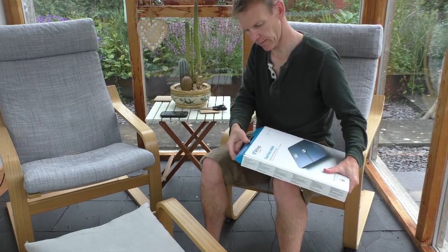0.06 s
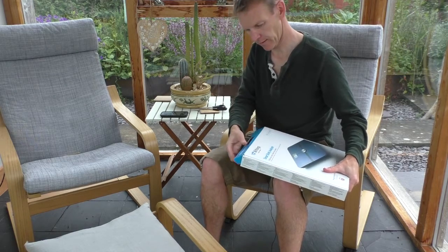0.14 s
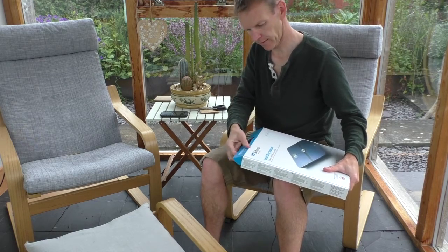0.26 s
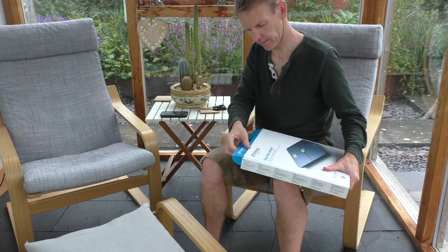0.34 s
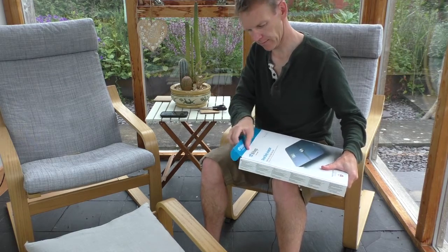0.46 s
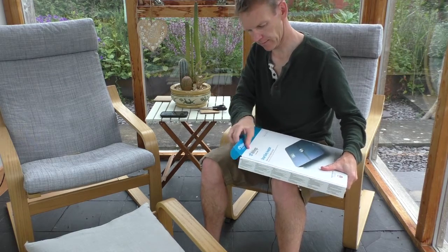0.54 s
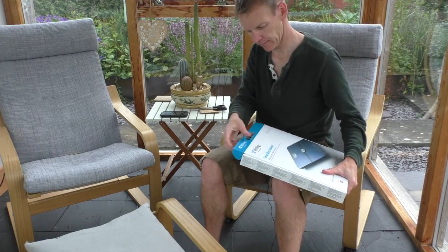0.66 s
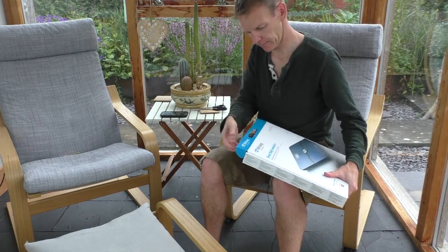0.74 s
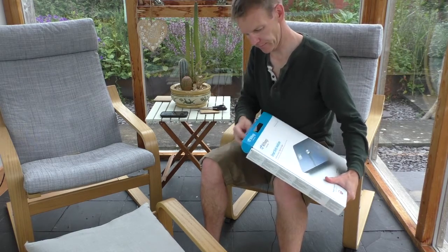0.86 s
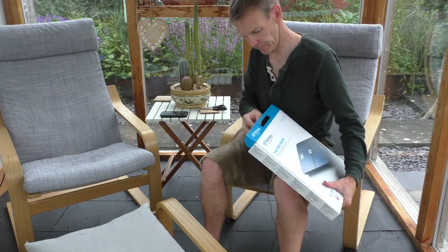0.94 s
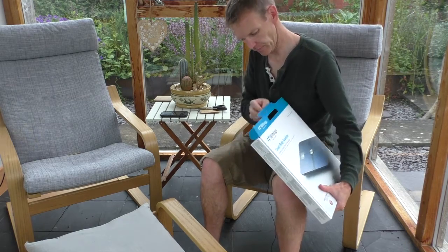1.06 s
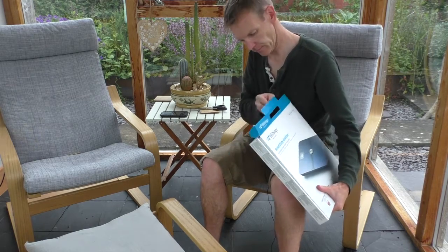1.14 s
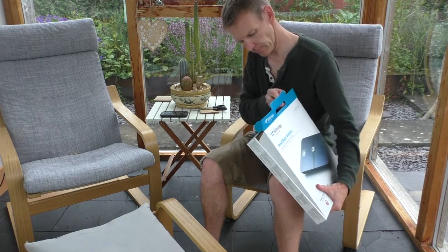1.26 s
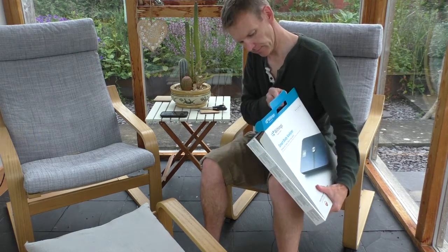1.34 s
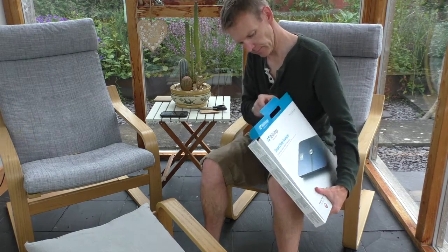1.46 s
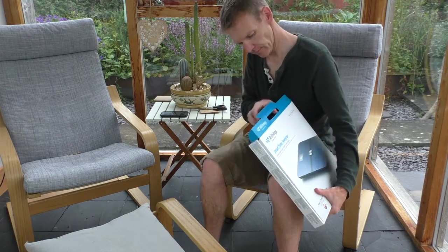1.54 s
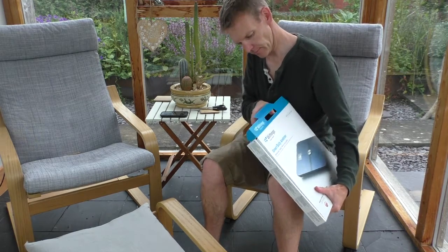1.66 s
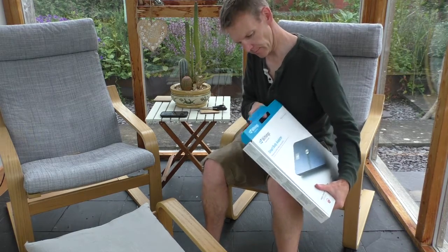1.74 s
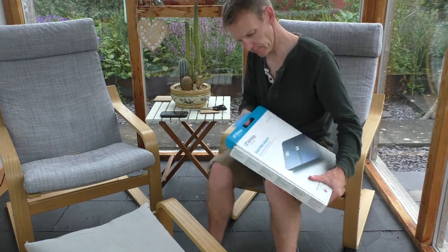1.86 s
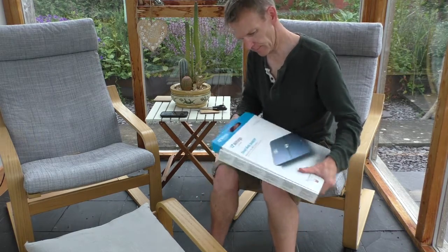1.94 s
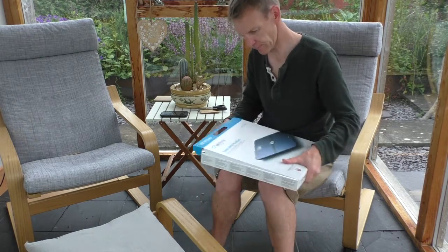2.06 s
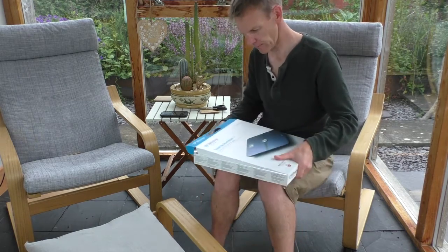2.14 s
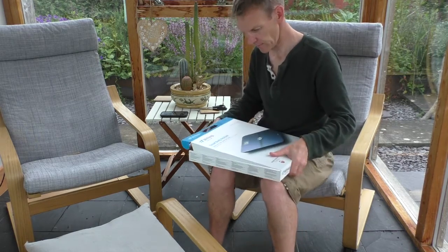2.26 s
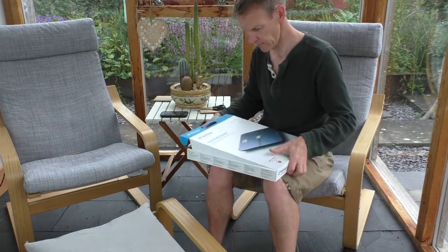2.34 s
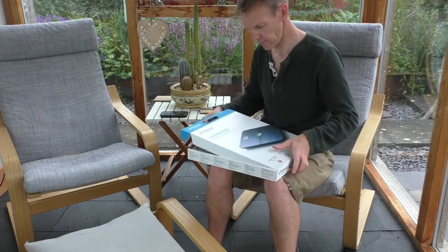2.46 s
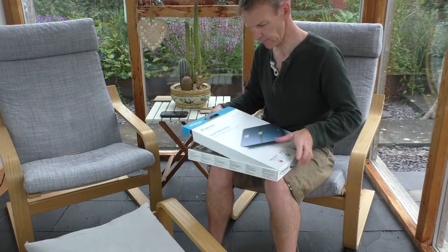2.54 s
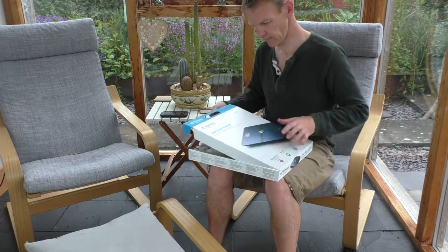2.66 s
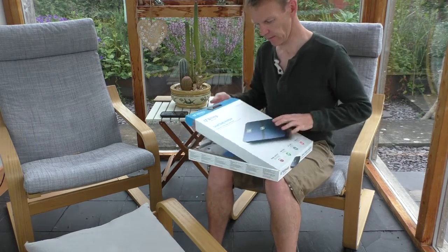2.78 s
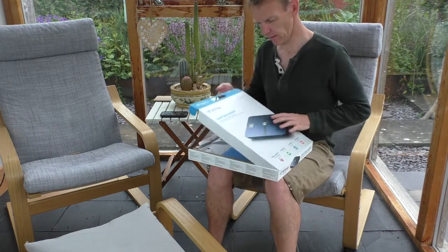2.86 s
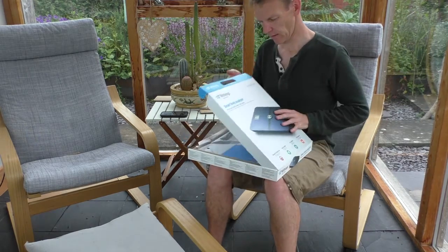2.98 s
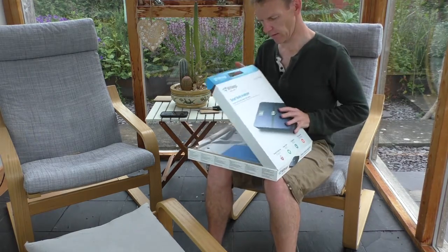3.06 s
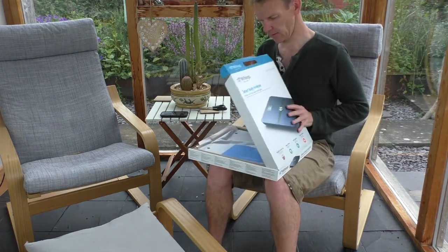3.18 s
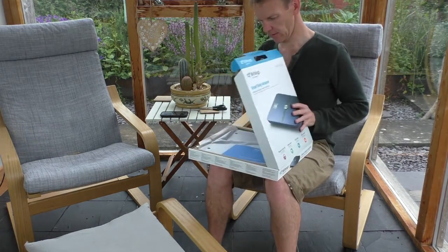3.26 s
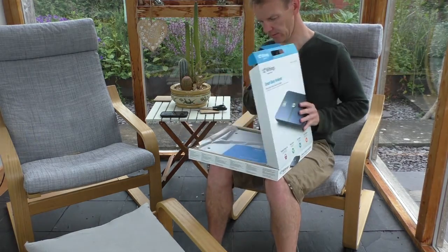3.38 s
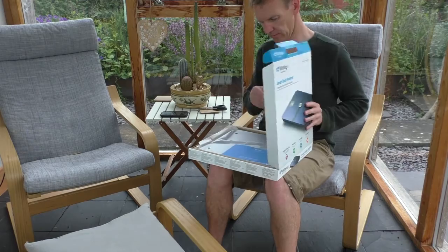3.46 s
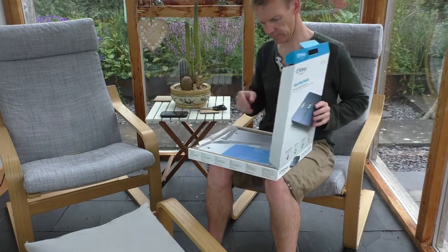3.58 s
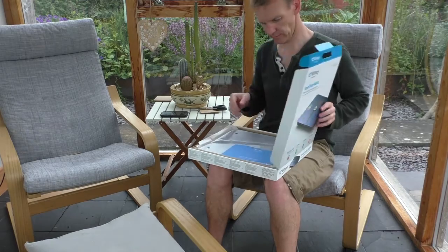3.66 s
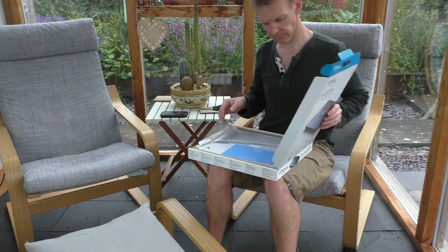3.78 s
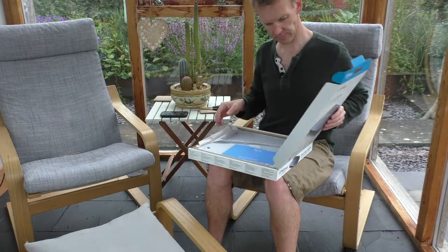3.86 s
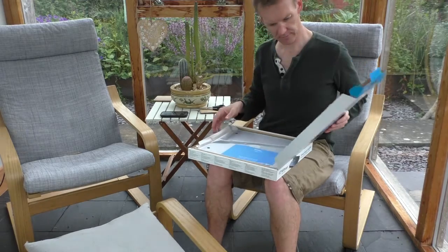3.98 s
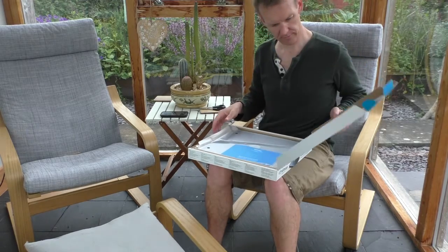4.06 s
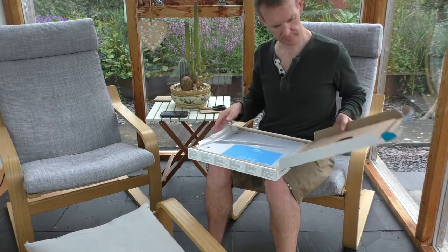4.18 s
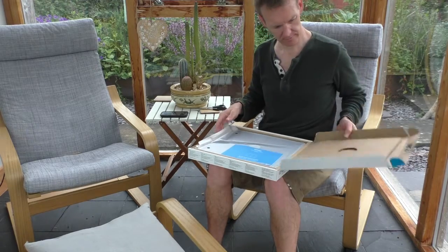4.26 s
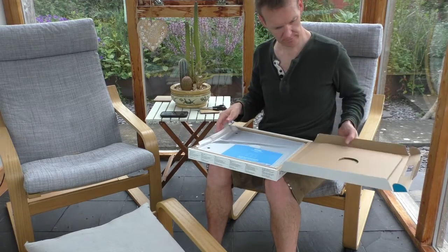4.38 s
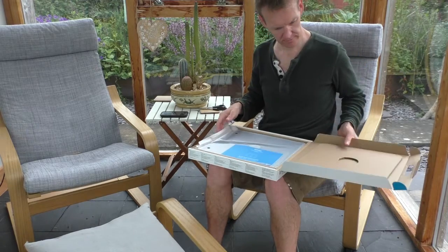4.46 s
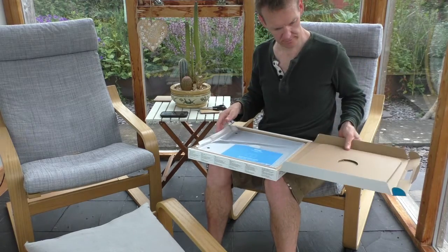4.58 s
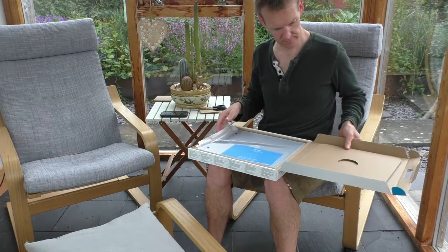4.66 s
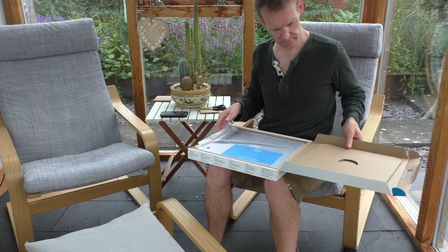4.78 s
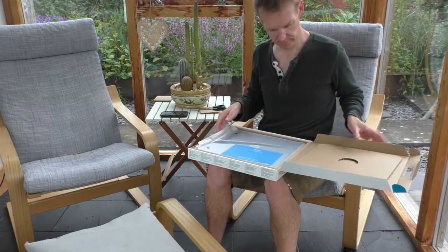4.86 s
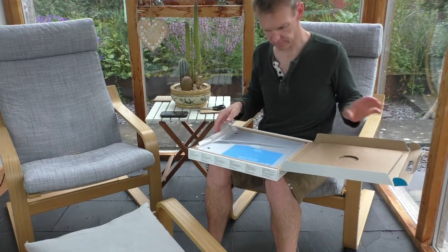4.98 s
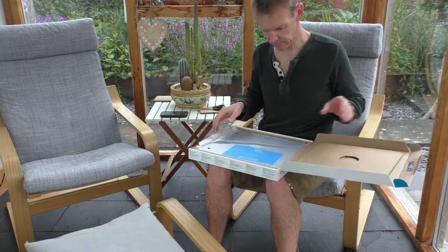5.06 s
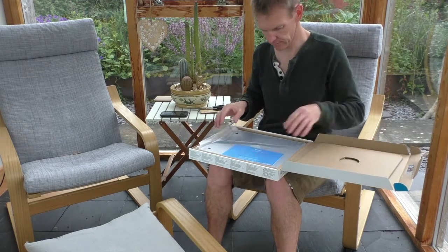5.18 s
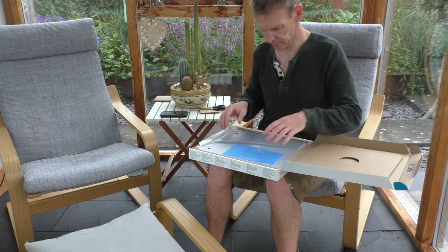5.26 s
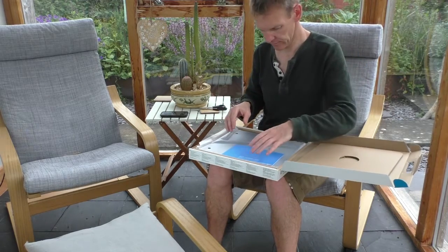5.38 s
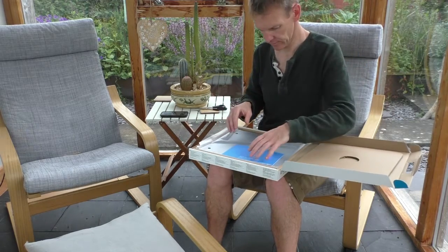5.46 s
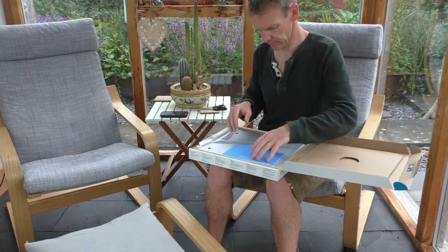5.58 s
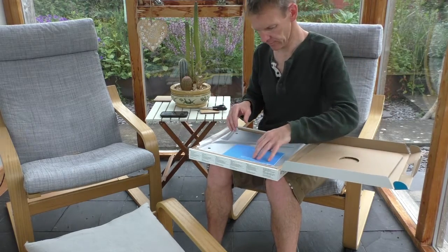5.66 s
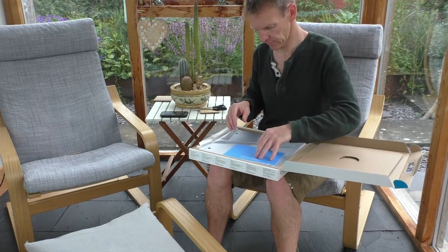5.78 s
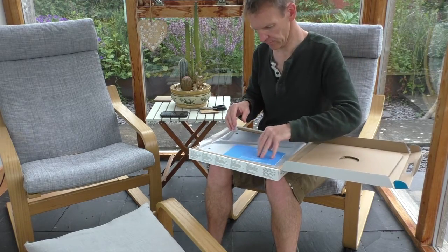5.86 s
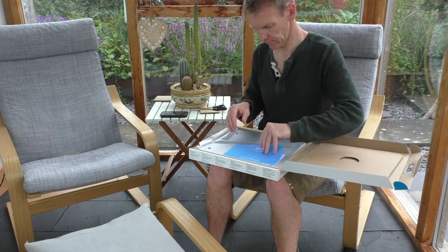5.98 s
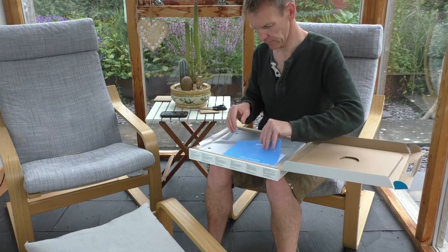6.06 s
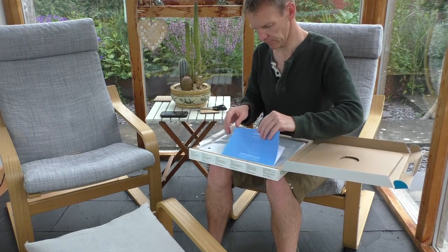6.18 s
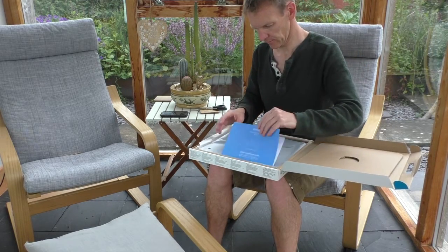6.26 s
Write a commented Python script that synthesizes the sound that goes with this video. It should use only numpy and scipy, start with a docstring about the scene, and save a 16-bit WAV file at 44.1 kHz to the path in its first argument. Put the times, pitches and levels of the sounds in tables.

```python
"""Cardboard box opened on a lap

In a small glazed room a flap is pulled free, the lid scrapes off its tray, folds open and is set down,
then a booklet slides out. Sliding card is filtered random clicks; taps and thumps are decaying sines;
snaps are noise bursts; the fold judders as a pulse train; the panels push low-frequency puffs of air.
The microphone is dull at 3.3-4.7 kHz and near 10.6 kHz, and fuller at 7 kHz."""
import sys
import numpy as np
from scipy import signal
from scipy.io import wavfile
from scipy.ndimage import uniform_filter1d

SR = 44100
rng = np.random.default_rng(int(sys.argv[2]) if len(sys.argv) > 2 else 0)


def output_pcm(signal):
    """Save a mono or channel-first signal as 16-bit PCM at the path in sys.argv[1].

    Samples are clipped to [-1, 1] before scaling.
    """
    pcm = np.clip(np.atleast_2d(signal).T, -1, 1) * 32767
    wavfile.write(sys.argv[1], SR, np.round(pcm).astype(np.int16))


N = 279153
TIME = np.arange(N) / SR

# modes of the box: f/Hz, relative level/dB, t60/s
BOX_MODES = [(235, -7, 0.14), (300, -9, 0.097), (356.7, -0.5, 0.16), (580, -7, 0.12), (660, -5.5, 0.015),
             (803, -6, 0.096), (930, -6, 0.083), (1199, 2.5, 0.033), (1345, 2.5, 0.042),
             (1600, -9.5, 0.048), (2000, -28, 0.008), (2620, 0, 0.034)]


def amp(db):
    """Decibels to amplitude gain."""
    return 10 ** (np.asarray(db) / 20)


def unit(x):
    """Scale to an rms of 1."""
    return x / np.sqrt(np.mean(x ** 2) + 1e-20)


def peaked(x):
    """Scale to a peak of 1."""
    return x / (abs(x).max() + 1e-20)


def read(points, hz):
    """Interpolate a table on a log-frequency axis."""
    f, value = np.transpose(points)
    return np.interp(np.log(hz + 1), np.log(f + 1), value)


def curves(rows, t=TIME):
    """Each column of a table, joined by straight lines in time."""
    s, *columns = np.transpose(rows)
    return [np.interp(t, s, column) for column in columns]


def add(mix, s, sound):
    """Mix a sound in at s seconds, in place."""
    part = mix[max(round(s * SR), 0):][:len(sound)]
    part += sound[:len(part)]


def colour(x, points, size=8192):
    """Minimum-phase FIR filter with the gains of a table of f/Hz, gain/dB."""
    hz = abs(np.fft.fftfreq(size, 1 / SR))
    log_gain = np.log(amp(read(points, hz)))
    minimum_phase = np.exp(np.conj(signal.hilbert(log_gain)))
    fir = np.fft.ifft(minimum_phase).real[:size // 2]
    return signal.oaconvolve(x, fir)[:len(x)]


def resonate(x, hz, width_hz):
    """Resonance of gain 1 on the curve hz: shift to 0 Hz, low-pass, shift back."""
    turn = np.exp(2j * np.pi * np.cumsum(hz) / SR)
    r = np.exp(-np.pi * width_hz / SR)
    return 2 * (turn * signal.lfilter([1 - r], [1, -r], x / turn)).real


def dying(t, t60):
    """Exponential decay by 60 dB in t60 seconds."""
    return np.exp(-np.log(1000) * t / t60)


def ring(t, hz, t60):
    """One struck mode: a decaying sine."""
    return np.sin(2 * np.pi * hz * t) * dying(t, t60)


def wander(per_s):
    """Random curve of unit rms: per_s Gaussian knots a second, joined by straight lines."""
    knots = rng.standard_normal(N // 20)
    return unit(np.interp(TIME * per_s, np.arange(len(knots)), knots))


def slips(per_s, spread_db, clump_db):
    """Fibres catch and let go: random clicks of uneven size and sign that come in clumps."""
    sizes = amp(spread_db * np.minimum(rng.exponential(1, N), 4)) * rng.choice([-1, 1], N)
    clicks = sizes * (rng.random(N) < per_s / SR)
    return unit(clicks * amp(clump_db * wander(per_s=120)))


def background(rms_db=-59.0):
    """Low steady background: coloured noise."""
    # f/Hz, gain/dB
    quiet_colour = [(10, 2.5), (22, 13.5), (40, 2), (92, -8), (266, -11), (452, -22.5), (1000, -32.5),
                    (2200, -34.5), (3400, -64), (7000, -38), (16000, -31.5)]
    return amp(rms_db) * unit(colour(rng.standard_normal(N), quiet_colour))


def room(x, wet_db=-8, build_s=0.0072):
    """Glass and tiles return a dense, short tail: sparse noise with frequency-dependent decay."""
    # reverberation: f/Hz, t60/s
    room_t60 = [(100, 0.65), (500, 0.72), (1500, 0.29), (5000, 0.48), (14000, 0.72)]
    t = TIME[:SR // 2]
    echoes = rng.standard_normal(len(t)) * (rng.random(len(t)) < 3000 / SR)
    echoes = echoes * (1 - np.exp(-(t / build_s) ** 2))
    hz, s, z = signal.stft(echoes, SR, nperseg=256)
    tail = signal.istft(z * dying(s, read(room_t60, hz)[:, None]), SR, nperseg=256)[1]
    wet = signal.fftconvolve(x, tail / np.linalg.norm(tail))[:N]
    return x + amp(wet_db) * colour(wet, [(40, -2.5), (200, -1), (8000, -11.5), (14000, -19)])


def sway(drone_db, base_db=-53.5, follow_db_per_db=0.76, smooth_s=0.14):
    """Panels push slow puffs of air: low noise that follows the smoothed drone level."""
    # f/Hz, gain/dB
    air_colour = [(8, -22.5), (20, 4), (32, -5.5), (55, -10), (100, -14), (170, -19), (400, -68.5)]
    # base_db holds at a drone level of -50 dB
    effort_db = uniform_filter1d(drone_db, int(smooth_s * SR)) + 50
    return amp(base_db + follow_db_per_db * effort_db) * unit(colour(rng.standard_normal(N), air_colour))


def judder(jitter=0.03, rough=0.15):
    """The stiff fold of the lid sticks and slips: a jittered pulse train plus noise, a brief groan."""
    # t/s, slip rate/Hz, level/dB
    fold_slips = [(3.411, 196, -46), (3.418, 227, -39), (3.429, 214, -40.5), (3.436, 385, -50),
                  (3.447, 380, -43), (3.460, 420, -58), (3.474, 230, -72)]
    rate_hz, db = curves(fold_slips)
    sounding = (TIME > fold_slips[0][0]) & (TIME < fold_slips[-1][0])
    step = rate_hz * (1 + jitter * wander(per_s=310)) * sounding / SR
    # one pulse per whole cycle, mean removed
    pulses = np.diff(np.floor(np.cumsum(step)), prepend=0) - step
    drive = pulses / pulses[sounding].std() + rough * rng.standard_normal(N)
    groan = colour(drive, [(90, -8), (220, 4), (390, 0.5), (520, -15), (780, -9.5),
                           (1300, -26), (2500, -29), (5000, -46)])
    return amp(db) * sounding * groan / groan[sounding].std()


def thumps(rise_s=0.0011, overtone_ratio=2.47, overtone_db=-12.5, overtone_life=0.58):
    """A panel flexes or lands on the knees, or the box lands on a wooden chair and rings long: two damped
    modes; overtone_life is a t60 ratio."""
    # t/s, peak/dB, f/Hz, cycles to -60 dB
    panel_blows = [(0.625, -33.5, 130, 0.5), (0.9157, -27.5, 106, 2.5), (0.92, -33, 48, 3),
                   (.941, -35.5, 215, 14), (1.2, -35.5, 31, 5.5), (1.351, -36.5, 28, 3.5),
                   (1.548, -29.5, 17.1, 5.5), (1.708, -35.5, 23.4, 5), (2.162, -24, 35, 5.5),
                   (2.171, -39.5, 135, 4), (2.622, -23.5, 64, 4.5), (2.658, -29.5, 32, 3.5),
                   (2.757, -38, 54, 5), (2.951, -35.5, 43, 7), (3.766, -34, 52.7, 3), (4.493, -37.5, 48, 6),
                   (4.5683, -31.5, 102, 2.5), (4.768, -44, 158, 27), (4.772, -37, 68, 9.5)]
    out, t = np.zeros(N), TIME[:SR // 3]
    for s, db, hz, swings in panel_blows:
        t60 = swings / hz
        swing = ring(t, hz, t60)
        swing = swing + amp(overtone_db) * ring(t, hz * overtone_ratio, overtone_life * t60)
        add(out, s, amp(db) * peaked(swing * (1 - np.exp(-t / rise_s))))
    return out


def snaps(t60=0.0029):
    """A fingernail or paper edge snaps: bright noise ticks with no box ring."""
    # t/s, peak/dB
    snap_events = [(0.4474, -26.5), (1.255, -31), (1.5125, -31.5), (6.23, -38), (6.2428, -45)]
    # f/Hz, gain/dB
    snap_colour = [(1000, -58), (4500, -43), (7000, 2.5), (10500, 11), (13000, 12), (16000, -2)]
    out, t = np.zeros(N), TIME[:SR // 20]
    for s, db in snap_events:
        burst = rng.standard_normal(len(t)) * dying(t, t60)
        add(out, s, amp(db) * peaked(colour(burst, snap_colour)))
    return out


def box_ring(t):
    """All box modes, in random shares for the place touched."""
    shares = rng.standard_normal(len(BOX_MODES))
    modes = [share * amp(db) * ring(t, hz, t60) for share, (hz, db, t60) in zip(shares, BOX_MODES)]
    return peaked(sum(modes))


def taps(box_db=-9, crack_t60=0.017, thud_db=-4, chatter_db=-11):
    """Card strikes card or a finger: crack, ringing spot with a 650 Hz dent, loose layers, box modes."""
    # t/s, spot peak/dB, spot f/Hz, spot t60/s, crack re spot/dB
    blows = [(0.1686, -50, 900, 0.015, -5), (.2425, -47, 930, 0.013, 0.5), (0.2634, -37, 265, .03, -12),
             (.4085, -40.5, 930, 0.01, 0), (0.4568, -35.5, 473, 0.039, -18), (.496, -45, 1120, 0.01, -9),
             (0.6276, -31.5, 410, 0.0082, -21), (0.6369, -33, 540, 0.022, -15.5),
             (.836, -52.5, 593, 0.016, -10), (.874, -42.5, 1760, 0.0051, -16), (.945, -36, 300, .04, -15),
             (1.0309, -41, 600, 0.037, -7), (1.1675, -25, 730, 0.014, -23), (1.1898, -32, 900, 0.032, -20),
             (1.191, -30, 394, 0.035, -27), (1.422, -34, 1800, 0.003, -4), (1.602, -40, 1200, 0.0043, -4),
             (1.723, -38.5, 500, 0.014, -14), (1.7636, -32, 1510, 0.059, -2.5),
             (1.7703, -35, 930, 0.045, -3), (2.021, -39, 607, 0.082, -23), (2.148, -30.5, 344, 0.063, -20),
             (2.1692, -23.5, 375, 0.033, -13), (2.6616, -37.5, 705, 0.0078, -22),
             (2.734, -30, 1960, 0.025, -5.5), (2.737, -27.5, 525, .013, -7.5),
             (3.04, -29, 1410, 0.022, -14.5), (3.316, -45.5, 3330, 0.0072, -14),
             (3.357, -49.5, 3330, 0.0089, -12), (3.753, -44.5, 486, 0.0076, -11),
             (3.8177, -53.5, 430, 0.0065, -5), (3.857, -48, 830, 0.0095, -7), (3.9125, -54, 860, .025, -4),
             (3.98, -46, 300, 0.031, -10), (4.1624, -49.5, 2100, 0.027, -1),
             (4.2099, -46.5, 2100, 0.013, -10), (4.299, -52, 385, 0.061, -10),
             (4.4906, -49, 350, 0.044, -13), (4.519, -44.5, 450, 0.0091, -9),
             (4.5815, -41.5, 1280, 0.019, -3), (4.584, -39, 498, 0.034, -25), (4.695, -50, 2570, 0.023, -7),
             (4.8, -49, 2200, 0.01, -10), (4.825, -58, 2100, .011, 3), (5.032, -53, 756, .023, -1),
             (6.045, -46.5, 1670, 0.0052, -4), (6.157, -38, 1420, 0.037, -21),
             (6.184, -39.5, 342, .022, -16)]
    # f/Hz, gain/dB
    crack_colour = [(200, -6), (800, -14), (2400, 16), (4200, 3.5), (7000, 8.5), (11000, 3.5), (16000, -6)]
    # loose layers of card: f/Hz, gain/dB
    chatter_colour = [(120, -40), (350, 15), (900, -18.5), (1700, 4), (3000, 2.5), (6000, -21)]
    out, t = np.zeros(N), TIME[:SR // 4]
    for s, db, hz, t60, crack_db in blows:
        spot = peaked(peaked(ring(t, hz, t60)) + amp(thud_db) * peaked(ring(t, 650, 0.0027)))
        crack = peaked(colour(rng.standard_normal(len(t)) * dying(t, crack_t60), crack_colour))
        chatter = peaked(colour(rng.standard_normal(len(t)) * dying(t, 0.027), chatter_colour))
        noise = amp(crack_db) * crack + amp(chatter_db) * chatter
        add(out, s, amp(db) * (noise - spot - amp(box_db) * box_ring(t)))
    return out


def crinkle(drone_db, rasp_db, hiss_db, per_s=55, spread_db=0.5, base_db=-70.0, follow_db_per_db=0.89):
    """Card flexes in tiny noise ticks that stand out most where it is only lightly moved."""
    # small creases: f/Hz, gain/dB
    crease_colour = [(120, -8), (350, -6), (1000, 6), (2300, 3.5), (4000, -9.5), (7000, -13), (15000, -29)]
    effort_db = 10 * np.log10(amp(drone_db) ** 2 / 4 + amp(rasp_db) ** 2 + amp(hiss_db) ** 2)
    # base_db holds at an effort of -56.5 dB
    level = amp(base_db + follow_db_per_db * (effort_db + 56.5))
    ticks = slips(per_s=per_s, spread_db=spread_db, clump_db=-1) * level
    # each tick takes one of 12 random waveforms
    spot, t = rng.integers(0, 12, N), TIME[:SR // 20]
    out = np.zeros(N)
    for k in range(12):
        tick = colour(rng.standard_normal(len(t)) * dying(t, 0.0092), crease_colour)
        out += signal.oaconvolve(ticks * (spot == k), tick / np.linalg.norm(tick))[:N]
    return out


def glance(x, depth=0.11, drift_s=0.000317):
    """Reflections off the tilting lid and knees: drifting delays make gliding comb ripples."""
    echoes = sum(np.interp(TIME - delay_s - drift_s * wander(per_s=3.3), TIME, x)
                 for delay_s in (.0041, .0073, .0118))
    return (x + depth * echoes) / np.sqrt(1 + 3 * depth ** 2)


def contact():
    """Power sum of all slides: drone, rasp, hiss (dB before rubbing's trims), edge f/Hz, edge re rasp/dB."""
    # hand or flap strokes: t of top speed/s, rise/s, fall/s, drone/dB, rasp/dB, hiss/dB,
    # edge f/Hz, edge re rasp/dB
    strokes = [(0.021, 0.079, 0.049, -41, -53.5, -64, 1280, 2),
               (.28, 0.11, 0.15, -45.5, -61, -73, 1090, -14),
               (0.398, 0.14, 0.17, -51.5, -56, -67.5, 1460, -8),
               (.525, 0.052, 0.012, -47.5, -78, -88, 1300, -6),
               (0.64, 0.018, 0.063, -47.5, -58, -68, 1320, -7),
               (0.972, 0.09, 0.047, -45, -51, -60, 1400, 3), (1.09, 0.17, 0.13, -55, -63, -70.5, 1390, -8),
               (1.252, 0.13, 0.097, -40, -44.5, -47.5, 2000, -3),
               (1.419, 0.053, 0.076, -44.5, -45.5, -63, 2500, 3),
               (1.52, 0.11, 0.088, -43.5, -46.5, -50.5, 2340, -1),
               (1.739, 0.065, 0.1, -51.5, -63.5, -70.5, 1600, -14),
               (3.165, 0.066, 0.047, -49, -52.5, -64.5, 1630, -4),
               (3.25, 0.042, 0.022, -53, -52.5, -45.5, 2060, -13),
               (3.43, 0.03, 0.047, -47, -60.5, -74, 2000, -6), (3.54, 0.12, 0.14, -64.5, -68, -70, 2370, 5),
               (3.92, 0.33, .13, -61.5, -71.5, -84, 2210, 5), (4.28, 0.16, 0.086, -67, -73.5, -88, 2320, 4),
               (4.505, 0.015, 0.037, -62.5, -63, -83, 2380, 4),
               (4.595, 0.04, 0.033, -49, -66, -69, 1600, -9), (4.70, 0.06, 0.036, -58.5, -66, -79, 2420, 5),
               (4.79, 0.061, 0.068, -55.5, -59, -66, 2300, 4),
               (5.042, .015, 0.026, -61, -71, -77, 2300, -4), (5.31, .24, 0.35, -61, -75, -107, 1400, -6),
               (5.68, 0.12, 0.069, -65.5, -85, -70.5, 1400, -7),
               (5.828, 0.044, 0.043, -84, -86, -67, 1410, -2), (5.96, 0.065, 0.13, -80, -70, -62, 1400, 5),
               (6.169, 0.073, 0.052, -53, -45.5, -57, 1600, 7),
               (6.238, 0.07, 0.13, -51.5, -52, -57.5, 1600, -3)]
    # lid pulled off its tray: t/s, drone/dB, rasp/dB, hiss/dB
    lid_slide = [(1.78, -50.5, -61, -71), (1.91, -52.5, -64.5, -59.5), (2.03, -45, -47, -53.5),
                 (2.16, -36, -47.5, -45), (2.27, -45, -52, -51.5), (2.37, -45.5, -49.5, -61.5),
                 (2.53, -51, -58, -66.5), (2.69, -49.5, -53.5, -58), (2.85, -53.5, -58.5, -74.5),
                 (3.04, -53, -51, -69), (3.11, -57, -57, -92), (3.32, -61, -68.5, -77)]
    # lid edge, higher as less of it stays in contact: t/s, f/Hz
    lid_edge = [(2.05, 1440), (2.37, 1380), (2.65, 2060), (2.92, 2120), (3.15, 1600)]
    lid_ring_db = -3.5  # re rasp
    # hands and knees never hold the box quite still: drone, rasp, hiss
    rest_db = [[-68], [-77], [-82]]
    # fall of drone, rasp, hiss one rise or fall time from top speed: hiss needs the most speed
    drops_db = np.array([[9.5], [13.5], [19.5]])
    stroke_shape = 1.72  # 1 = pointed, 2 = bell

    t = TIME[::64]
    lid = amp(curves(lid_slide, t)) ** 2 * (t > lid_slide[0][0]) * (t < lid_slide[-1][0])
    power = amp(rest_db) ** 2 + lid
    # edge pitch and level are averaged by rasp power
    edge = power[1] * np.array([curves(lid_edge, t)[0], np.full(len(t), lid_ring_db)])
    for s, rise_s, fall_s, drone_db, rasp_db, hiss_db, edge_hz, edge_db in strokes:
        slowing = np.maximum((s - t) / rise_s, (t - s) / fall_s) ** stroke_shape
        top_db = np.array([[drone_db], [rasp_db], [hiss_db]])
        stroke = amp(top_db - np.minimum(drops_db * slowing, 100)) ** 2
        power = power + stroke
        edge = edge + stroke[1] * np.array([[edge_hz], [edge_db]])
    return [np.interp(TIME, t, c) for c in (*10 * np.log10(power), *edge / power[1])]


def rubbing(drone_db, rasp_db, hiss_db, edge_hz, edge_db):
    """Sliding card: slips make panels drone, edges rasp and coated faces hiss; noise rings the lid gap."""
    # gap under the lid, lower as it widens: t/s, f/Hz, level re drone/dB
    cavity = [(1.85, 960, -33), (2.08, 720, -7), (2.35, 644, -2), (2.65, 525, 4.5), (2.95, 546, -3),
              (3.3, 490, -37)]
    # colours: f/Hz, gain/dB
    drone_colour = [(60, -28), (130, -1), (205, -1.5), (280, 3), (380, 2.5), (700, -0.5), (950, -2),
                    (1400, -2), (2600, -51)]
    rasp_colour = [(400, -39), (800, -2.5), (1150, 6.5), (1700, 3.5), (2300, -2), (3000, 2), (4500, -13.5),
                   (8000, -30)]
    hiss_colour = [(1500, -19.5), (3000, 0), (4500, -9), (7000, 1.5), (9500, -3.5), (12500, -10.5),
                   (16000, -13.5)]

    drag = slips(per_s=2700, spread_db=2.5, clump_db=4.0)
    panels = unit(sum(amp(db) * resonate(drag, np.full(N, hz), 3.0 / t60) for hz, db, t60 in BOX_MODES))
    drone = unit(colour(drag, drone_colour)) + amp(-6.5) * panels
    drone = unit(colour(drone, [(100, 4.0), (1000, 2.5), (2500, -14.0)]))

    cavity_hz, cavity_db = curves(cavity)
    gap = resonate(resonate(rng.standard_normal(N), cavity_hz, 205), cavity_hz, 205)
    gap = amp(cavity_db) * unit(gap)

    rasp = unit(colour(slips(per_s=6000, spread_db=3.0, clump_db=0.97), rasp_colour))
    scrape = slips(per_s=6000, spread_db=3.5, clump_db=2.9)
    edge = unit(resonate(resonate(scrape, edge_hz, 950), edge_hz, 950))
    rasp = (rasp + amp(edge_db) * edge) / np.hypot(1, amp(edge_db))

    hiss = unit(colour(slips(per_s=15000, spread_db=4.0, clump_db=1.6), hiss_colour))

    # the card catches and lets go: every slide flutters
    grip = unit(amp(0.66 * wander(per_s=70)))
    layers = amp(drone_db - 6.0) * (drone + gap) + amp(rasp_db - 1.1) * rasp + amp(hiss_db + 2.0) * hiss
    return grip * glance(layers)


def scene():
    """The handled box in the room, plus air puffs and a low steady background."""
    drone_db, rasp_db, hiss_db, edge_hz, edge_db = contact()
    sliding = rubbing(drone_db, rasp_db, hiss_db, edge_hz, edge_db)
    sliding = sliding + crinkle(drone_db, rasp_db, hiss_db)
    box = sliding + taps() + snaps() + thumps() + judder()
    return (room(box) + sway(drone_db) + background())[None]


def record(dry):
    """Microphone colour, then a linear-phase low-pass."""
    # f/Hz, gain/dB
    microphone = [(2200, 1.5), (2750, -4.5), (3300, -13), (3750, -8.5), (4700, -7.5), (5500, 2),
                  (7000, 0.5), (8500, -1), (9600, -4), (10600, -14.5), (11700, -4), (13000, -0.5),
                  (15800, -3)]
    edge_hz = 15900
    heard = colour(dry[0], microphone)
    low_pass = signal.firwin(511, edge_hz, window=("kaiser", 9), fs=SR)
    return signal.oaconvolve(heard, low_pass, "same")[None]


dry = scene()
out = record(dry)
output_pcm(out)
```